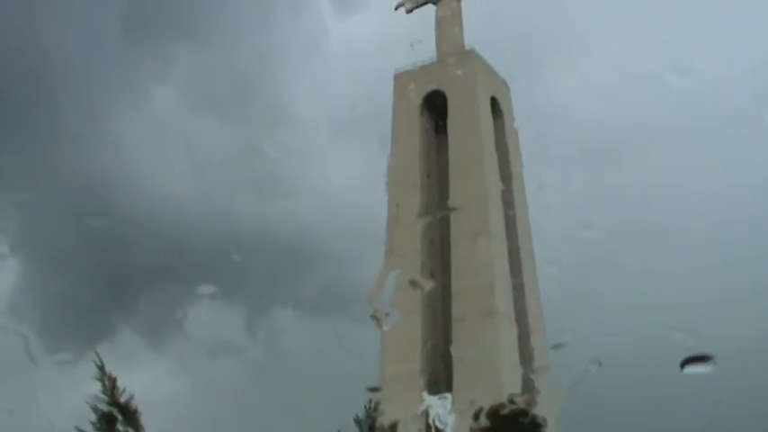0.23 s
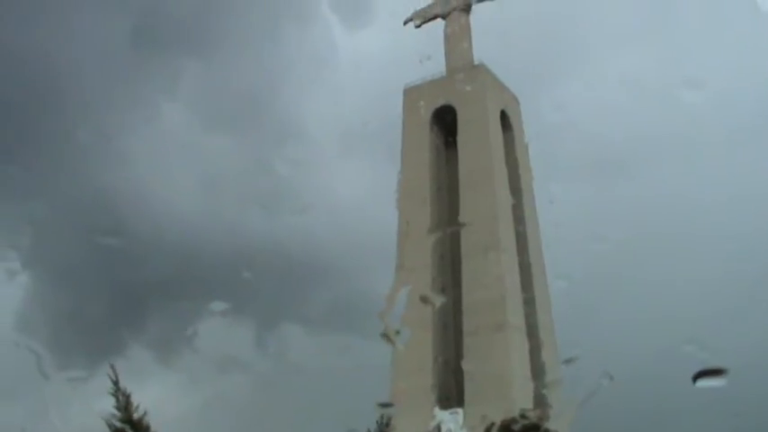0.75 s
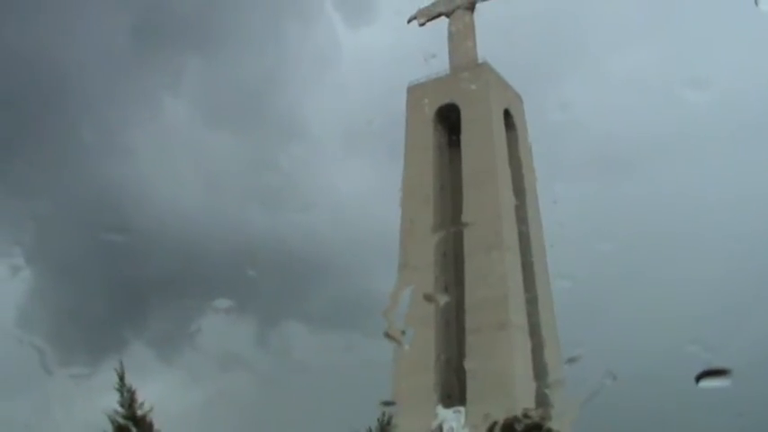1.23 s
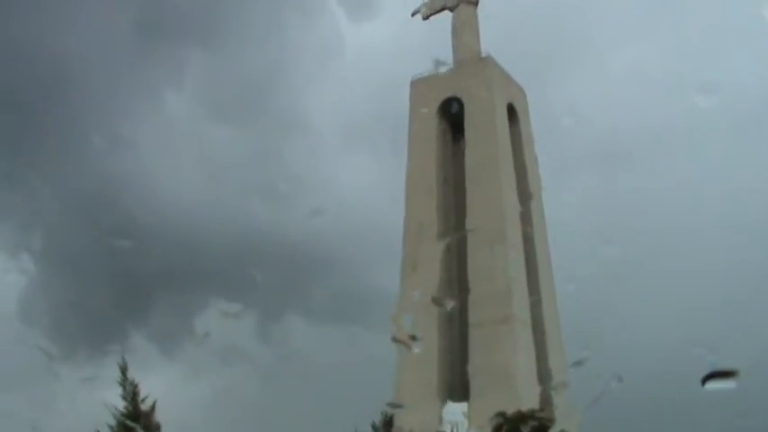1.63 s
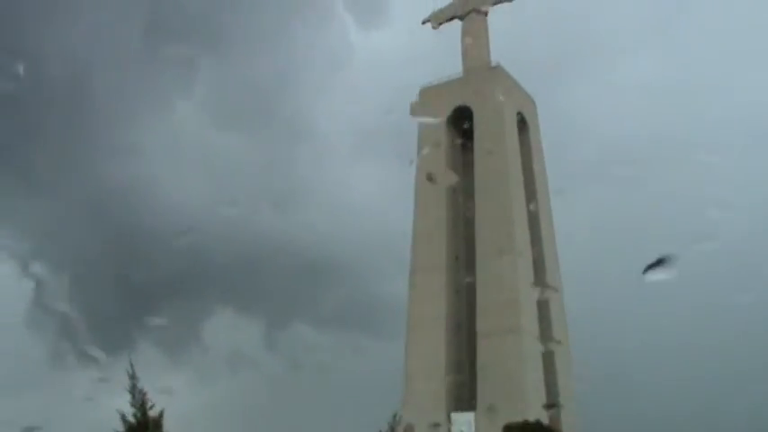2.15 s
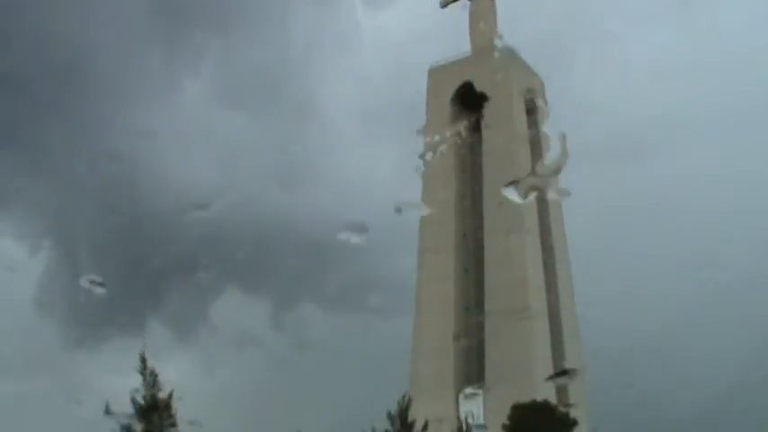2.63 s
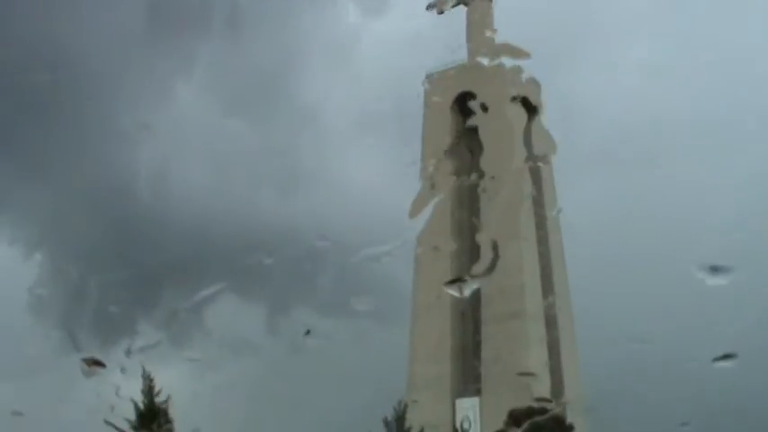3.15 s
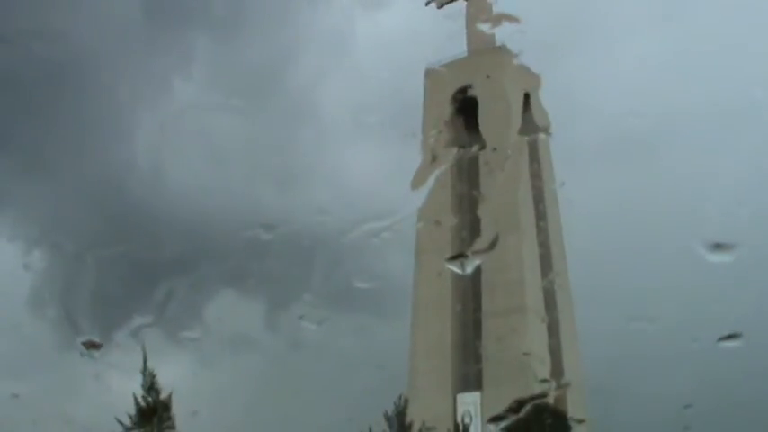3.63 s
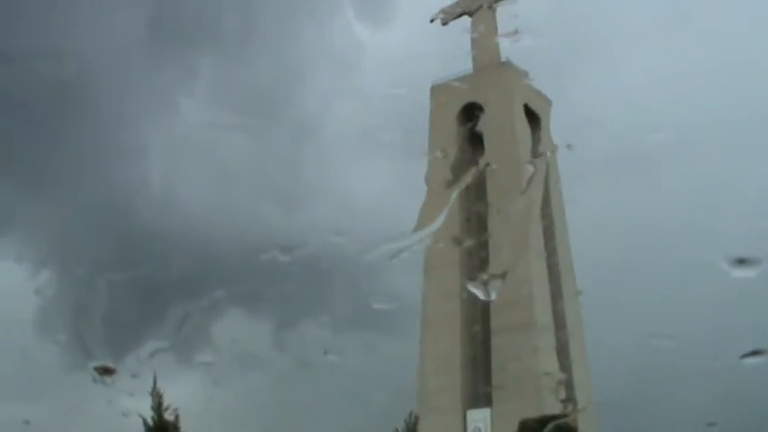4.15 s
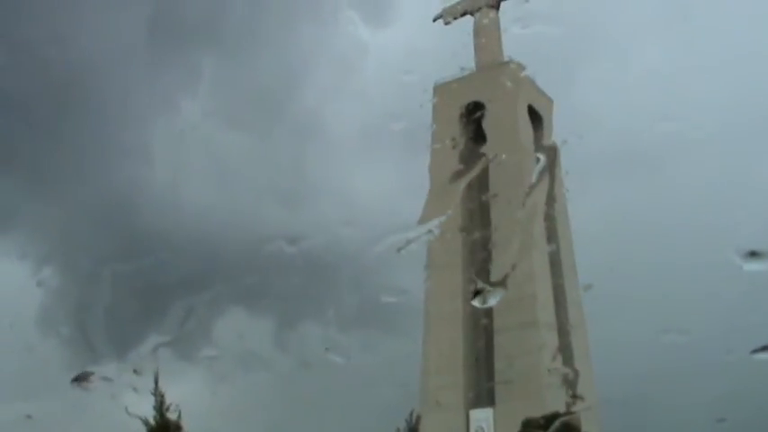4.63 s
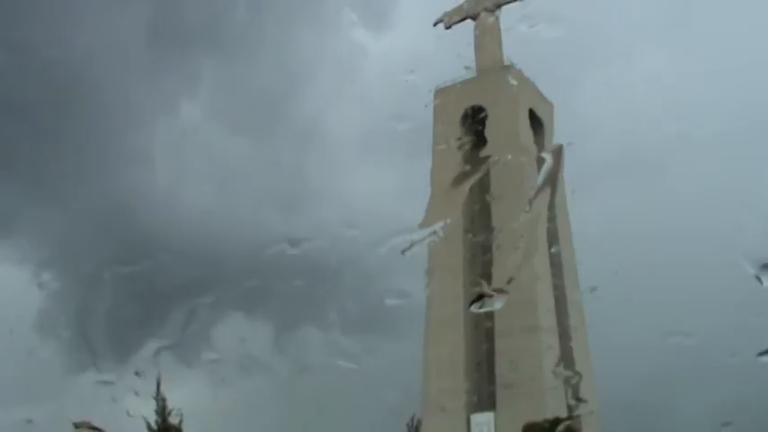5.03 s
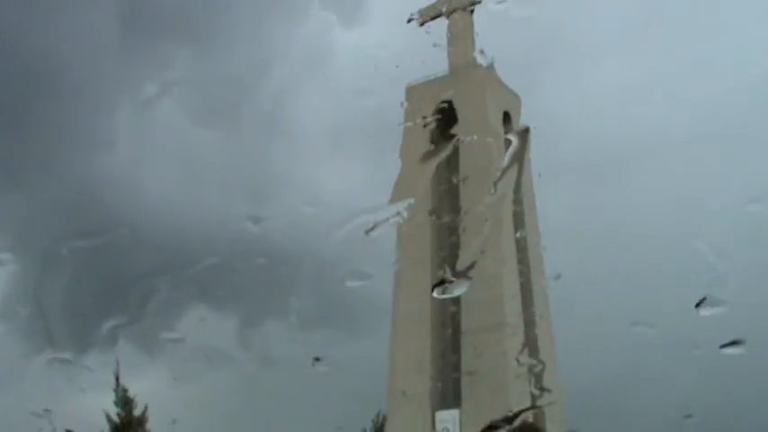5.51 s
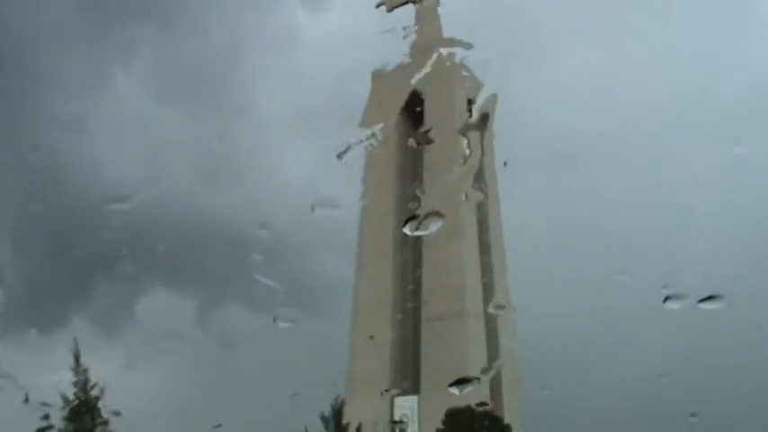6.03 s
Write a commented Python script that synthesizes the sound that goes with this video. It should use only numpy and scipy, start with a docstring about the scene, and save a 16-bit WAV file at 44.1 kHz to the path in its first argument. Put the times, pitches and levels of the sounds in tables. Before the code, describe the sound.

Big scattered raindrops tick and drum on a parked car's glass and roof over a fine rain wash, as deep thunder cracks and rolls.

```python
"""Inside a parked car, large scattered raindrops strike the glass and roof.
Each drop ticks on the pane and sets the panels drumming, as short bursts of ringing noise.
Finer rain is a flickering wash of noise, with a faint steady electronic whine.
Thunder rolls in as noise through the cabin's low modes, and the camera's gain control ducks under it."""
import sys
import numpy as np
from scipy import signal
from scipy.fft import rfft, irfft, next_fast_len
from scipy.io import wavfile
from scipy.ndimage import uniform_filter1d

SR = 44100
rng = np.random.default_rng(int(sys.argv[2]) if len(sys.argv) > 2 else 0)


def persist_wave(psi):
    """Save psi, clipped to +-1, as 16-bit WAV."""
    counts = np.round(np.clip(psi, -1, 1) * 32767).astype(np.int16)
    wavfile.write(sys.argv[1], SR, np.atleast_2d(counts).T)


N = 276507  # length of the scene in samples


def gain_of(db):
    """Turns decibels into an amplitude factor."""
    return 10 ** (np.asarray(db) / 20)


def evened(x):
    """Scales a signal to rms 1."""
    return x / np.sqrt(np.mean(x ** 2) + 1e-20)


def left_right(db):
    """Splits a left-over-right level difference evenly between the two channels."""
    return gain_of(np.array([[0.5], [-0.5]]) * db)


def smoothed_twice(x, size):
    """Smooths by two running averages in a row."""
    return uniform_filter1d(uniform_filter1d(x, size), size)


def add(mix, start_s, sound):
    """Mixes a stereo sound in at a given time, cutting it off at the end of the mix."""
    part = mix[:, round(start_s * SR):][:, :sound.shape[1]]
    part += sound[:, :part.shape[1]]


def noise_pair(size):
    """Spectrum of stereo noise, as alike left and right as two close microphone ports hear it."""
    # how alike the two sides are: (frequency [Hz], likeness [0 to 1])
    likeness = [(40, 1), (80, 0.99), (140, 0.97), (290, 0.7), (640, 0.28), (1410, 0.29), (3100, 0.48),
                (6820, 0.32), (15000, 0.82)]
    # which side is louder: (frequency [Hz], left over right [dB])
    side_lean = [(60, 0.5), (150, 1.5), (380, 3), (950, 4), (2380, 1.5), (5980, 1), (15000, 0.5)]
    # which side comes first: (frequency [Hz], left ahead [rad])
    side_lead = [(100, -0.26), (300, 0.34), (780, 0.014), (1380, -0.22), (2300, -0.0098), (4800, -0.004),
                 (10000, 0)]
    hz = np.fft.rfftfreq(size, 1 / SR)

    def curve(table):
        f, value = np.transpose(table)
        return np.interp(np.log(hz + 1), np.log(f), value)

    same = np.clip(curve(likeness), 0, 1)
    left, other = rfft(rng.standard_normal((2, size)))
    shared = same * left * np.exp(-1j * curve(side_lead))
    right = shared + np.sqrt(1 - same ** 2) * other
    return hz, np.array([left, right]) * left_right(curve(side_lean))


def band(hz, spectrum, centre_hz, width_hz):
    """Noise of rms 1 through a resonance: strongest at the centre, halved half a width away."""
    return evened(irfft(spectrum / (1 + ((hz - centre_hz) / (0.5 * width_hz)) ** 2)))


def electronic_whine():
    """The camera's electronics: a faint, steady, very high sine tone."""
    whine_hz, level_db = 15625, -80
    return gain_of(level_db) * np.sin(2 * np.pi * whine_hz * np.arange(N) / SR)


def wash():
    """Far rain and small drops: noise in drifting patches, with a flicker across all bands at once."""
    # tone colour of the far rain: (frequency [Hz], relative level per Hz [dB])
    wash_colour = [(120, -22), (200, 7), (440, -27), (647, -1.5), (950, -13.5), (1100, -10.5), (1350, -14),
                   (2170, -16.5), (2650, -19), (3300, -17.5), (4200, -24), (16000, -37.5)]
    level_db, patch_db, flicker_db = -42.5, 1.9, 4.5
    window, hop = 512, 128  # samples
    hz = np.fft.rfftfreq(window, 1 / SR)
    noise = irfft(noise_pair(size=(N // hop + 5) * hop)[1])
    z = signal.stft(noise, nperseg=window, noverlap=window - hop)[2]
    # patches are smooth over pitch and time; the flicker is quicker
    across_pitch = uniform_filter1d(rng.standard_normal(z.shape[1:]), 8, 0)
    patches = evened(uniform_filter1d(across_pitch, 20, 1))
    flicker = evened(uniform_filter1d(rng.standard_normal(z.shape[2]), 4))
    f, db = np.transpose(wash_colour)
    colour_db = np.interp(np.log(hz + 1), np.log(f), db)[:, None]
    flicker_share = 1 / (1 + (hz[:, None] / 7000) ** 2)  # weaker in the treble
    z *= gain_of(colour_db + patch_db * patches + flicker_db * flicker * flicker_share)
    sound = signal.istft(z, nperseg=window, noverlap=window - hop)[1][:, :N]
    return gain_of(level_db) * evened(sound)


def thunder():
    """The roll drives the cabin's modes; each swells and fades by chance, partly in step with the others."""
    # course of the thunder: (time [s], roll level [dB], upper boom over roll [dB], deep swell level [dB])
    roll_course = [(0, -51, 3, -45.5), (2.25, -45, 3, -49.5), (2.43, -35, -8, -41), (2.8, -29, -9.5, -41),
                   (2.999, -33.5, -1.5, -40), (3.23, -31, -14.5, -43), (3.34, -34, 3.5, -40),
                   (3.47, -24, -1, -35), (3.505, -10, -11.5, -29), (3.57, -12.5, 0.5, -30),
                   (3.61, -12, 2.5, -30), (3.85, -19, -3, -38), (3.93, -21.5, 0.5, -31),
                   (4.24, -23, -9, -33), (4.45, -28.5, -4.5, -35), (4.63, -19, -1.5, -27),
                   (4.68, -21, 1.5, -27), (4.72, -13, -2.5, -25), (4.77, -19, -1, -31),
                   (4.82, -13.5, -8, -36), (4.89, -21, -11, -29), (4.96, -21.5, 0.5, -33),
                   (5.03, -32, 9, -30), (5.2, -27, 1, -31), (5.55, -23, -3, -33), (5.61, -21, -9, -19),
                   (5.68, -28.5, 2, -30), (6.02, -30, -5, -35), (6.12, -27.5, -18, -40),
                   (6.27, -37.5, 2, -36)]
    # cabin modes and other ringing parts, each table: (centre [Hz], width [Hz], relative level [dB])
    boom_modes = [(97.3, 23, -6.5), (141.7, 35, 3.5)]
    upper_boom_modes = [(191, 38, 0)]
    deep_modes = [(41.2, 22, 6), (52.7, 15, -4.5)]
    rattle_modes = [(314, 49, -12), (385.5, 92, -6)]
    crackle_modes = [(516, 125, 0.5), (670, 560, -1)]
    surge_db, surge_s = 1.0, 0.039  # the roll comes in uneven lumps

    s, roll_db, upper_db, deep_db = np.transpose(roll_course)
    # rattle and crackle follow the roll less steeply than the boom does
    over_loud_db = roll_db + 21
    rattle_db = -29.5 + 0.65 * over_loud_db
    crackle_db = -36 + 0.98 * over_loud_db
    parts = [(boom_modes, roll_db), (upper_boom_modes, roll_db + upper_db), (deep_modes, deep_db),
             (rattle_modes, rattle_db), (crackle_modes, crackle_db)]

    t = np.arange(N) / SR
    hz, z = noise_pair(size=2 * next_fast_len(N // 2 + 1))
    lump = max(int(surge_s * SR), 1)
    shared_surge = evened(smoothed_twice(rng.standard_normal(N), lump))
    out = np.zeros((2, N))
    for modes, course_db in parts:
        ring = sum(gain_of(own_db) * band(hz, z, f, width) for f, width, own_db in modes)
        ring = evened(ring)[:, :N]
        # the storm sets the roll's loudness, so the slowest chance swells are evened out
        ring = ring / np.sqrt(uniform_filter1d((ring ** 2).mean(0), size=2000) + 0.3)
        own_surge = evened(smoothed_twice(rng.standard_normal(N), lump))
        surge = evened(own_surge + shared_surge)
        out += gain_of(np.interp(t, s, course_db) + surge_db * surge) * ring
    return out


def tick(t, hz, z, tick_hz, spray_db):
    """The snap of the blow itself: a wide crack around a short ring, over within a few milliseconds."""
    snap = band(hz, z, tick_hz, 710) + gain_of(0.5) * band(hz, z, 0.99 * tick_hz, 3960)
    hiss = gain_of(spray_db + 7.5) * band(hz, z, 6800, 8000)
    # each part peaks after this many seconds, then dies away
    u, v = np.maximum(t, 0) / 0.0014, np.maximum(t, 0) / 0.00048
    return snap * u * np.exp(1 - u) + hiss * v * np.exp(1 - v)


def drop(blow_db, tick_hz, ring_db, drum_db, spray_db, drum_hz, pan_db):
    """A tick and a knock where the drop lands, then every band rises and dies: treble first, bass last."""
    # bands of dense modes that a blow sets ringing; softness stretches or shortens the decay. Each table:
    # (centre [Hz], width [Hz], relative level [dB], 60 dB decay before softness [s], rise [s])
    panel_bands = [(219, 93, -10, 0.79, 0.023), (503, 426, -5, 0.36, 0.0036), (884, 496, -3.5, 0.2, 0.0069)]
    pane_bands = [(1540, 1400, -7, 0.16, 0.0047), (2967, 1200, -9.5, 0.13, 0.0034)]
    spray_bands = [(5020, 2800, -7, 0.097, 0.0037), (8040, 6200, -11.5, 0.085, 0.0024),
                   (10700, 2500, -20, 0.027, .001)]
    hz, z = noise_pair(size=8192)
    t = np.arange(8192) / SR
    soft = np.clip(gain_of(0.6 * (ring_db + 5)), 0.3, 1.3)  # a stiff spot rings weakly and briefly
    lead_s = 0.003 * soft  # through a soft panel the treble runs ahead of the blow

    ring = 0
    groups = [(panel_bands, drum_db - 6.5), (pane_bands, ring_db), (spray_bands, spray_db + ring_db + 7.0)]
    for bands, group_db in groups:
        for f, width, own_db, t60, rise in bands:
            fade = gain_of(group_db + own_db - 60 * t / (t60 * soft))
            ring = ring + fade * (1 - np.exp(-t / rise)) * band(hz, z, f, width)
    # the splash lands unevenly
    droplets = gain_of(1.78 * evened(uniform_filter1d(rng.standard_normal(len(t)), size=120)))

    late = np.maximum(t - lead_s, 0)  # time since the blow
    knock_shape = gain_of(drum_db - 9.0 - 60 * late / 0.035) * (1 - np.exp(-late / 0.0011))
    knock = knock_shape * band(hz, z, drum_hz, 140)
    snap = gain_of(-18 - 0.23 * ring_db) * tick(late, hz, z, tick_hz, spray_db)
    fade_out = np.cos(np.pi / 2 * t / t[-1])
    return lead_s, (ring * droplets + knock + snap) * gain_of(blow_db) * left_right(pan_db) * fade_out


def loud_drops(out):
    """Adds the loud drops one by one, each knocking its own patch of panel."""
    # the loud drops; drop() balances ring, drumming and spray further from these settings:
    # (time [s], blow [dB], tick [Hz], pane ring [dB], panel drumming [dB], spray [dB], left over right [dB])
    big_drops = [(0.0307, -12, 1800, -14, -8.5, -34, -3), (.1775, -21, 1640, -4.5, 5, -18, -3),
                 (0.2228, -12, 2940, -13.5, -15, -37, -3), (0.2737, -11.5, 2920, -12.5, -14, -26, -4.5),
                 (0.327, -14, 3000, -14, -12.5, -21, 0), (0.3656, -20, 2260, -6.5, -6.5, -41, -3),
                 (.389, -16, 3060, -10.5, -8.5, -27, -3), (0.4417, -28, 1780, -2.5, 4, -24, -3.5),
                 (0.499, -29.5, 1510, -1.5, 3.5, -24, -3), (0.5306, -13, 2760, -7.5, -5.5, -33, -3.5),
                 (0.5507, -17.5, 2850, -15, -7, -31, 0), (0.652, -24.5, 1550, -1, -2, -19, -3),
                 (0.7085, -22.5, 1710, -4, 1.5, -21, -5), (0.7356, -20.5, 1990, -4.5, 2.5, -17, -0.5),
                 (0.7827, -21.5, 1750, -4.5, -6, -17, 0), (0.7989, -17.5, 1790, -6, -4, -31, 0),
                 (.827, -18.5, 1680, -5, 0.5, -21, -2.5), (.8414, -25, 1720, -6.5, 2, -31, -2),
                 (0.8835, -35, 1680, -5, 8, -22, -3), (0.9324, -26.5, 2600, -10.5, -4.5, -30, -3),
                 (1.053, -30.5, 2240, -7, -6, -19, -8), (1.104, -21.5, 1500, -3, -4, -17, -3),
                 (1.1877, -37, 1730, -9.5, 4, -0.5, 1), (1.2273, -24, 1790, -4.5, 5, -25, -1.5),
                 (1.3314, -33, 2280, -8, -18, -11, 0), (1.3418, -8.5, 2400, -11.5, -39, -12.5, -4),
                 (1.3734, -28.5, 1700, 4, 4, -28, -3), (1.4063, -29.5, 3330, -6, 7.5, -15, -4),
                 (1.4365, -21.5, 1800, -4, -0.5, -21, -3.5), (1.4775, -15.5, 1840, -12.5, -8, -11.5, -2),
                 (1.6623, -40, 1790, -6, 5, -3, -6), (1.698, -23.5, 1710, -3.5, 0.5, -28, -2.5),
                 (1.7687, -30.5, 1520, -5.5, -2, -7, -1), (1.8395, -22, 1570, -4, 4, -21.5, -3.5),
                 (1.9049, -21, 1500, -8.5, 4, -29, 0), (1.9224, -22, 1500, -5, 6, -20, -3),
                 (1.944, -20, 1780, -10, -8, -20, 3), (1.967, -19, 2210, -8, -3, -28, -4),
                 (1.9801, -21.5, 1800, -2.5, 3, -16.5, -3), (2.0393, -20.5, 2000, -8.5, -17, -20, -1),
                 (2.1061, -24, 2510, -5, 0, -16.5, -4), (2.1137, -19.5, 2210, -5, 0.5, -21, -3),
                 (2.1257, -16, 1770, -11.5, -7, -15, -1), (2.1932, -39, 1500, -2, 10.5, -13, -3),
                 (2.2657, -37, 1500, -1.5, 4, -7, -3), (2.2876, -18, 2260, -8, -10, -24, -5.5),
                 (2.3142, -21.5, 1520, -1.5, 4.5, -21, -3), (2.3367, -24, 1770, -5.5, 3, -14, -1),
                 (2.386, -26, 1560, -4, 5, -16, -1.5), (2.4236, -33, 2890, 4.5, 13, -19, -2.5),
                 (2.5065, -35, 1670, -5, 15, -11, -2.5), (2.525, -26, 1810, -3.5, 6, -25, -3.5),
                 (2.5495, -18.5, 1880, -9.5, -13, -34, -2), (2.59, -30, 2200, -6, -12, -20, 3),
                 (2.633, -18.5, 2440, -11.5, -6, -27, 3), (2.6719, -18.5, 1980, -4.5, -4, -24, -3),
                 (2.816, -22, 1750, -3, 0.5, -16, -2.5), (2.8447, -28, 3250, -9.5, -1, -21, -1),
                 (2.8841, -22, 2210, -14.5, 3, -23, -2), (2.9097, -24.5, 1910, -5, 4, -8, -1),
                 (2.9384, -21, 3080, -9.5, -13, -18, -4), (3.057, -18, 1790, -8.5, -6.5, -20, 0),
                 (3.0839, -29, 1520, -4, 7.5, -19, -3), (3.1292, -31, 1570, -2, 4.5, -21, -3),
                 (3.1602, -33.5, 1630, -3, -2, -16, -3), (3.1843, -15, 4600, -12.5, -22, -35, -3),
                 (3.2136, -21.5, 1570, -5.5, 6, -19, -3.5), (3.243, -19.5, 1630, -11, 2.5, -19, -1),
                 (3.2878, -29.5, 1810, -3.5, 3.5, -25, -2), (3.3533, -33.5, 1640, -4, 4.5, -12, -2),
                 (3.417, -27, 3240, -2.5, 3.5, -17, -1), (3.4525, -26, 1550, -12.5, 0, -22, -2),
                 (3.495, -23.5, 1760, -5.5, -12, -13.5, -3), (3.5945, -28.5, 1870, -5.5, 5.5, -16, -1),
                 (3.6536, -19.5, 1650, -6, 2, -18, -0.5), (3.7188, -21, 1920, -3.5, -.5, -20, -1),
                 (3.7414, -28.5, 2750, -8, 7.5, -22, 3), (3.8331, -25, 1620, -2.5, 4.5, -22, 0.5),
                 (3.8614, -34, 1650, -3.5, 2, -19, -1), (3.895, -21.5, 1540, -11.5, -8, -12, 0),
                 (3.9616, -26, 1560, -8, 8.5, -37, -4), (4.0049, -15, 1740, -8.5, -6, -20, 0),
                 (4.0697, -28, 3400, -2, 4, -14.5, -1.5), (4.115, -21, 2400, -6, -0.5, -33, -2),
                 (4.2037, -18, 2800, -14.5, -11, -18, 4), (4.333, -26, 2600, -3.5, 4.5, -23, -3.5),
                 (4.4509, -28, 2220, -6, 11, -39, -3), (4.4631, -26.5, 3070, -4.5, 2.5, -22, -6),
                 (4.4934, -26.5, 1740, -5, -2, -27, 6), (4.4997, -16, 1640, -7.5, -0.5, -20, -3),
                 (4.5518, -16, 1700, -5.5, -8.5, -17.5, -5), (4.6247, -25, 1640, -5, 2, -20, -4),
                 (4.6473, -22, 1700, -4.5, 0, -9.5, -3.5), (4.6795, -20.5, 1960, -11.5, -4, -16, -3),
                 (4.7294, -22.5, 1560, -6, -8, -29, -2.5), (4.799, -29.5, 1590, -1, -6, -18, -3),
                 (4.9902, -22.5, 2420, -10, 3, -11, -5), (5.0283, -23, 2400, -3.5, -8, -19, -1),
                 (5.0667, -23.5, 1580, -8, -25, -14, 0), (5.1252, -23.5, 1580, -6.5, -3, -38, -5),
                 (5.1754, -19.5, 2560, -6, -20, -39, -1), (5.224, -15.5, 2500, -11, -13, -34, -4),
                 (5.2931, -21.5, 3080, -4, -1.5, -16, 0.5), (5.302, -18, 1620, -7.5, -14, -13.5, -1),
                 (5.3484, -14, 3140, -12, -19, -20, -2), (5.3747, -14.5, 2340, -7, -7, -22, -5),
                 (5.4071, -26.5, 3160, -3.5, 0, -10, -4), (5.4259, -22.5, 1500, -3.5, 0, -18, -2.5),
                 (5.4779, -24, 1710, -2, 0.5, -13.5, -3), (5.5536, -23.5, 2620, -1.5, -9, -22, -5),
                 (5.5684, -24.5, 2540, -5.5, 0, -6, -3), (5.5844, -21.5, 2680, -11, -2.5, -8, 2),
                 (5.6581, -21, 2830, -7.5, -5, -15, -3), (5.7164, -25, 1560, -4, 2, -11.5, -3),
                 (5.7392, -35.5, 1750, 4.5, -5, -20, -1), (5.7902, -28.5, 1490, -1.5, 6, -18, -3),
                 (5.8575, -23.5, 1570, -5.5, 2, -21, -1), (5.876, -20, 3040, -6.5, -14, -15.5, -4),
                 (5.893, -15.5, 1900, -14.5, -11, -24, 7), (5.9257, -25, 1750, -5.5, 7, -14.5, -3),
                 (6.0369, -17.5, 2560, -9, -36, -11.5, -4.5), (6.0783, -18, 1930, -5, -8, -19, -1)]
    low_hz, high_hz = 517, 906  # range of the panel patches
    for s, *row, pan_db in big_drops:
        drum_hz = low_hz * (high_hz / low_hz) ** rng.random()
        lead_s, sound = drop(*row, drum_hz, pan_db)
        add(out, s - lead_s - 0.0006, sound)


def small_drops(out):
    """Adds a patter of small drops of a dozen kinds, falling by chance."""
    kinds, per_s, base_db, spread_db = 12, 40, -46, 3.5
    falls = rng.random(N) < per_s / SR
    size = gain_of(spread_db * np.minimum(rng.exponential(1, N), 4)) * falls
    kind = rng.integers(0, kinds, N)
    for k, chances in enumerate(rng.uniform(-1, 1, (kinds, 6))):
        tone, ring, drum, spray, pan, patch = chances
        sound = drop(base_db, tick_hz=2600 + 700 * tone, ring_db=-6 + 4 * ring, drum_db=-3.5 + 5 * drum,
                     spray_db=-34.5 + 5 * spray, drum_hz=700 + 200 * patch, pan_db=4 * pan)[1]
        for at in np.flatnonzero(size * (kind == k)):
            add(out, at / SR, size[at] * sound)


def rain():
    """Loud and small drops together; the cabin lining soaks up the top of each splash."""
    out = np.zeros((2, N))
    loud_drops(out)
    small_drops(out)
    dull_hz = 10550
    return signal.sosfilt(signal.butter(N=2, Wn=dull_hz, fs=SR, output="sos"), out)


def scene():
    """Whine, wash, thunder and drops together."""
    return electronic_whine() + wash() + thunder() + rain()


def record(dry):
    """Gain control ducks under the loudest sounds and the very tops clip; then the treble is cut off."""
    threshold_db, recovery_db_per_s, duck_share = -14.5, 28.0, 0.23
    clip_db, edge_hz = -1.0, 15900
    power_db = 10 * np.log10(abs(uniform_filter1d((dry ** 2).mean(0), size=2000)) + 1e-12)
    # the held level jumps up with each peak, then falls steadily
    fall = np.arange(N) * recovery_db_per_s / SR
    held_db = np.maximum.accumulate(power_db + fall) - fall
    over_db = np.maximum(held_db - threshold_db, 0)
    ducked = dry / gain_of(duck_share * uniform_filter1d(over_db, size=1000))
    clipped = np.clip(ducked, -gain_of(clip_db), gain_of(clip_db))
    low_pass = signal.firwin(511, edge_hz, window=("kaiser", 9), fs=SR)
    return signal.oaconvolve(clipped, low_pass[None], "same")


dry = scene()
out = record(dry)
persist_wave(out)
```